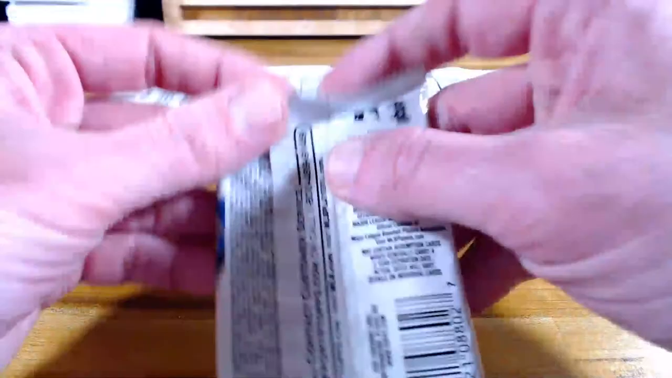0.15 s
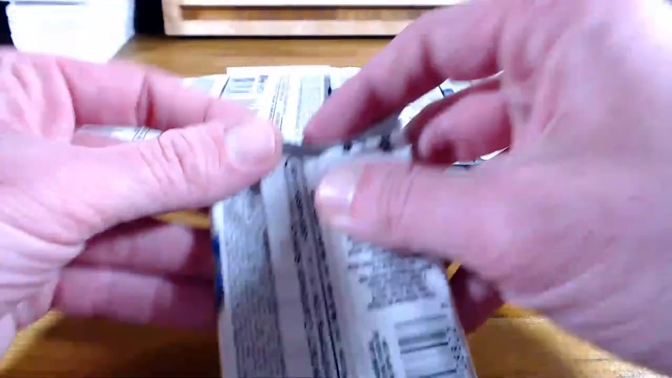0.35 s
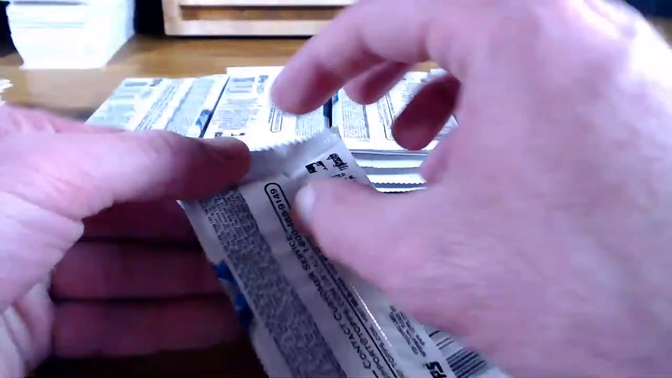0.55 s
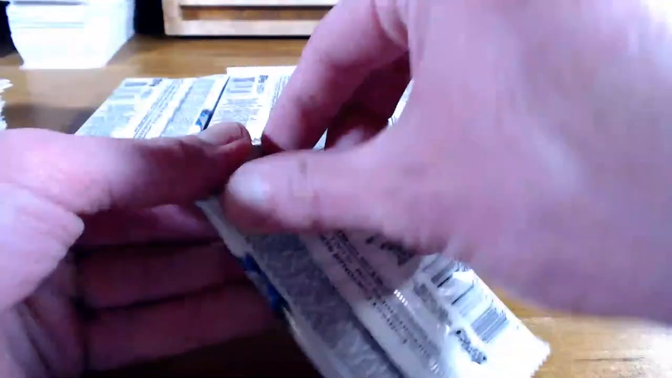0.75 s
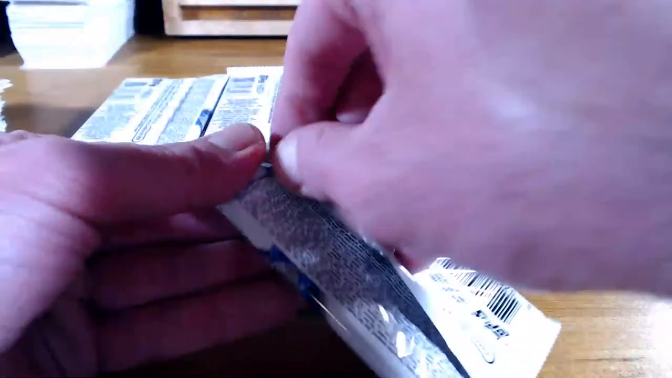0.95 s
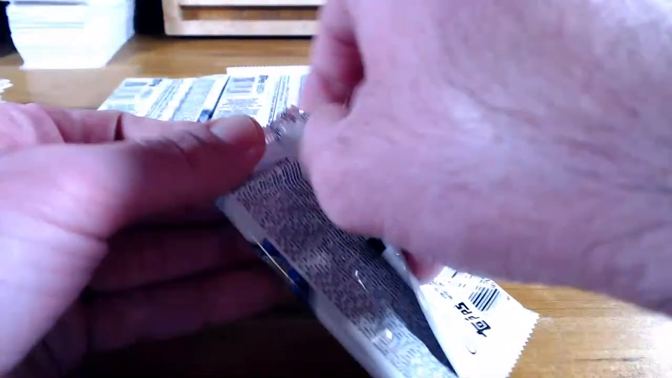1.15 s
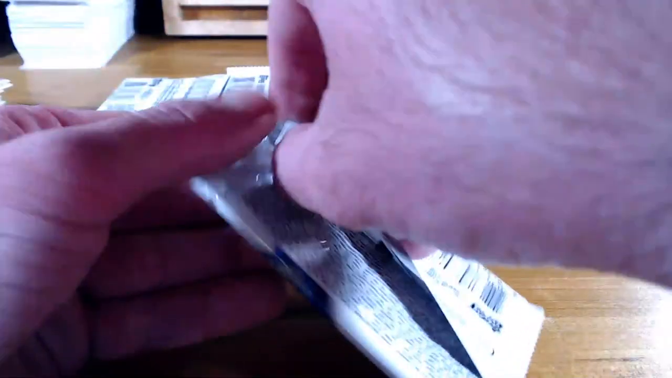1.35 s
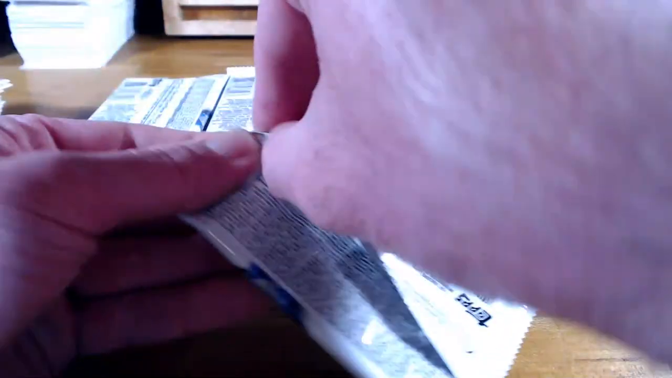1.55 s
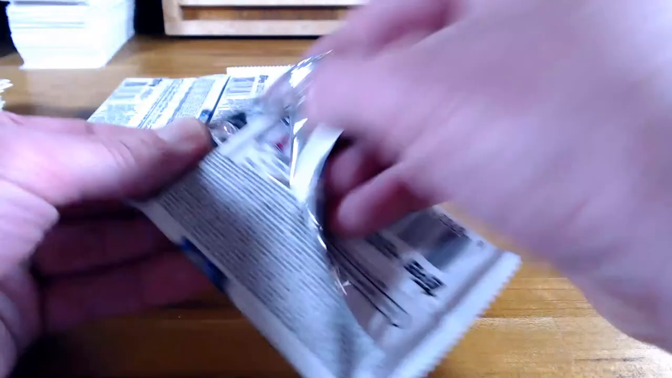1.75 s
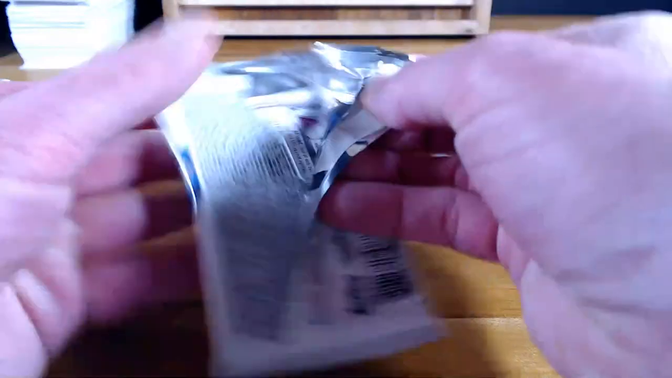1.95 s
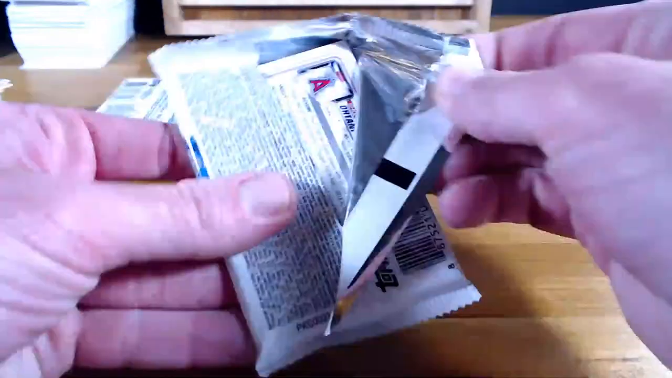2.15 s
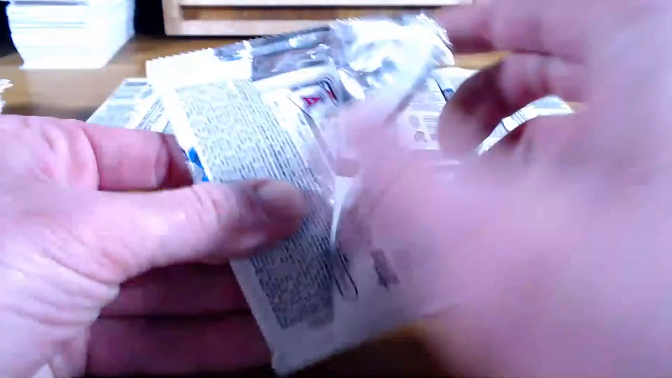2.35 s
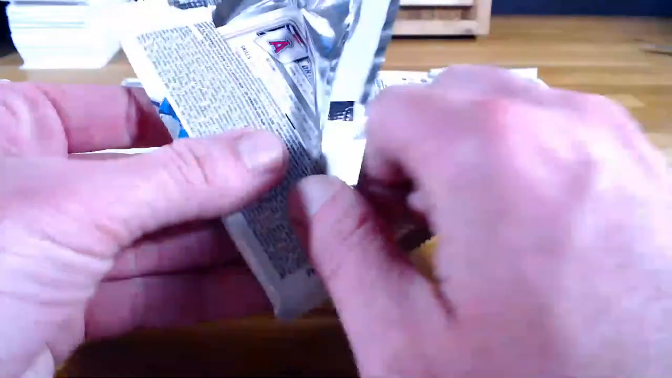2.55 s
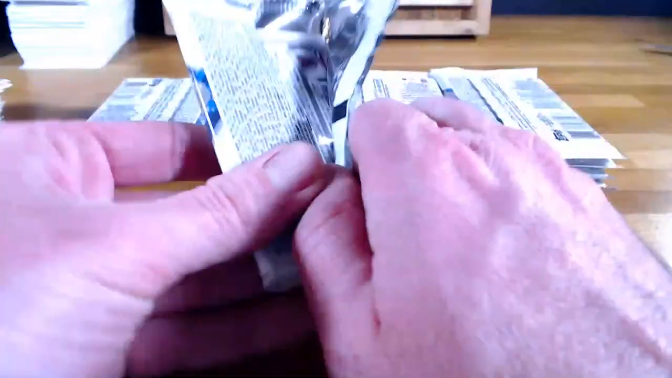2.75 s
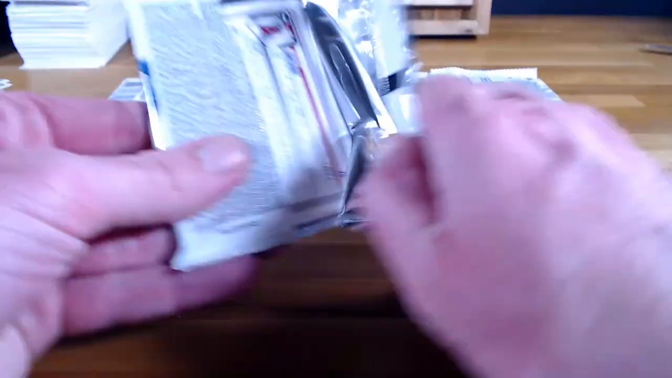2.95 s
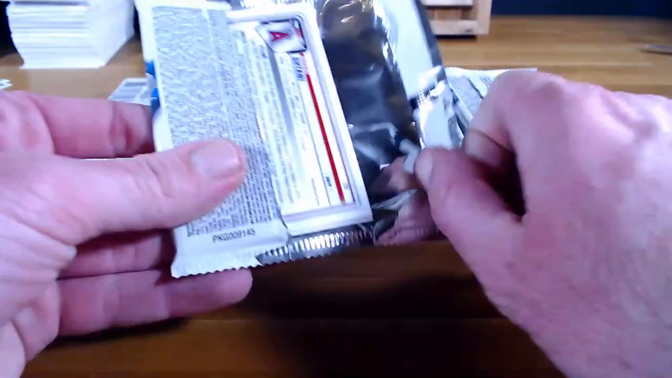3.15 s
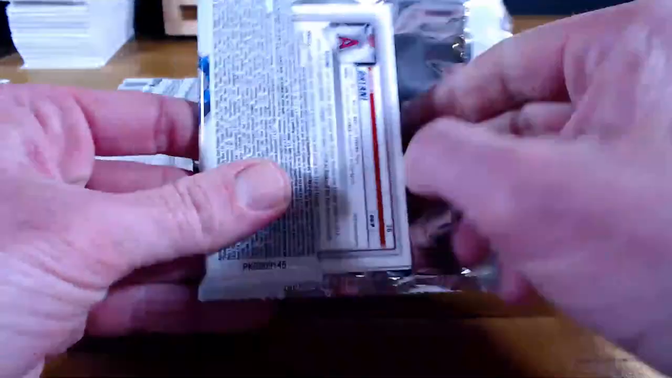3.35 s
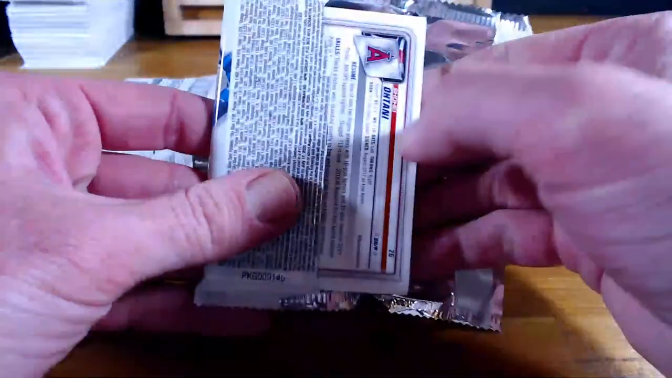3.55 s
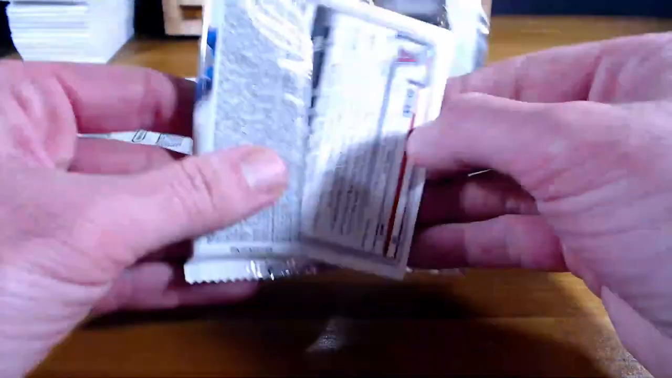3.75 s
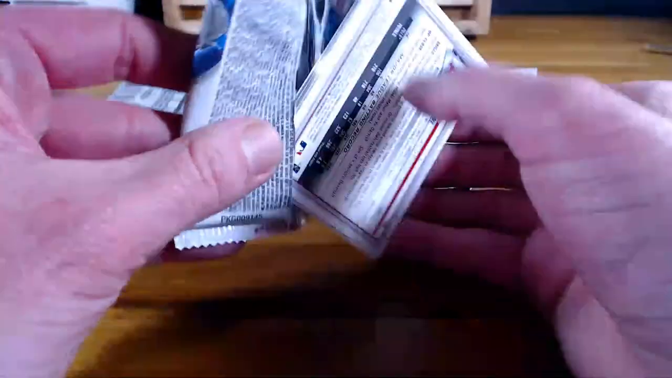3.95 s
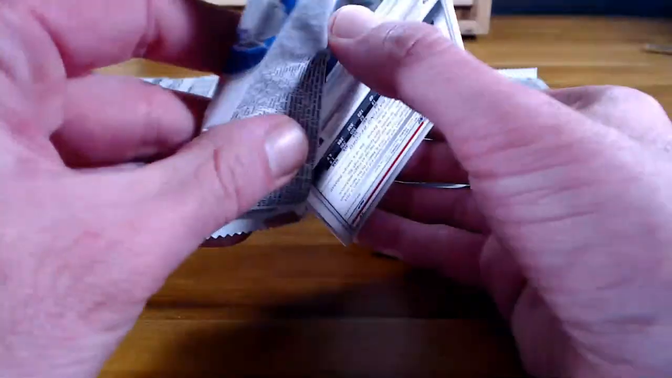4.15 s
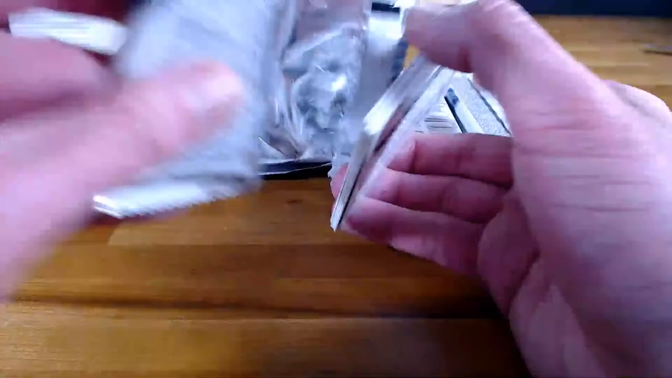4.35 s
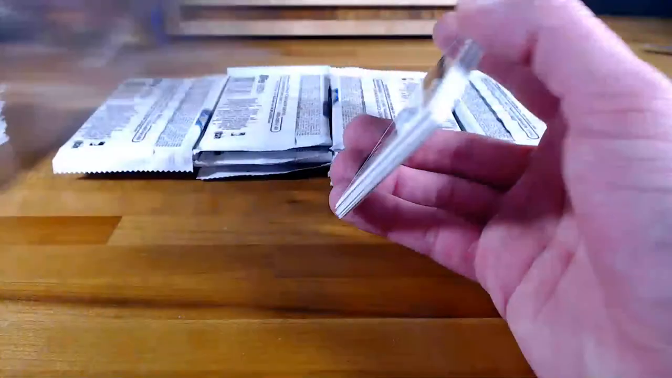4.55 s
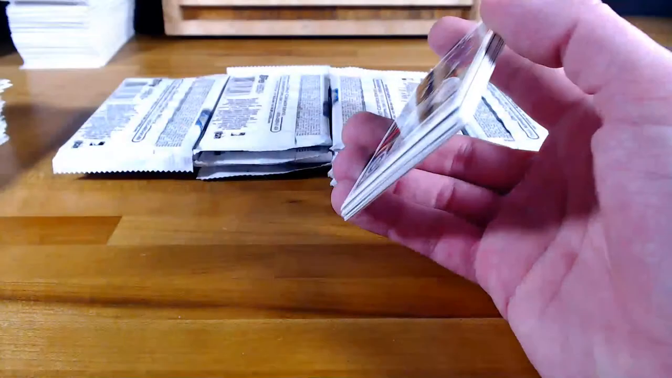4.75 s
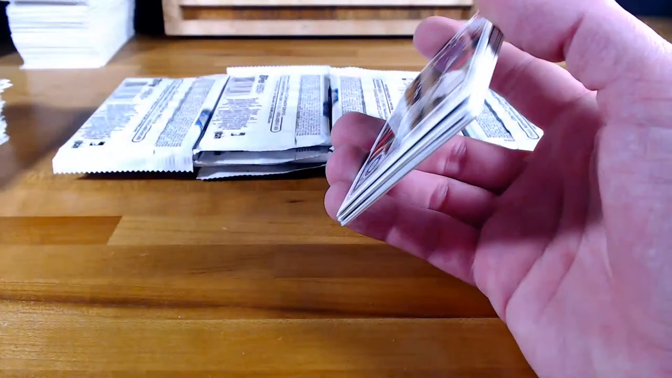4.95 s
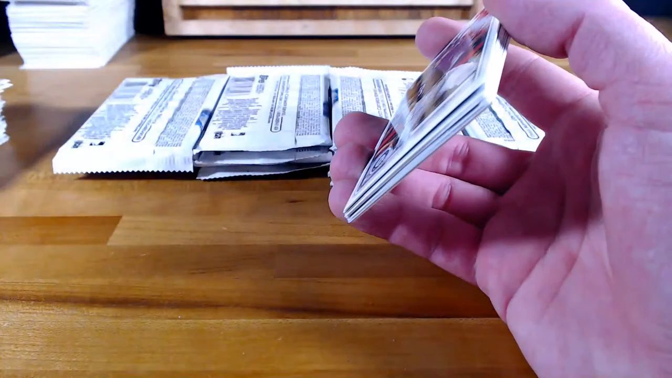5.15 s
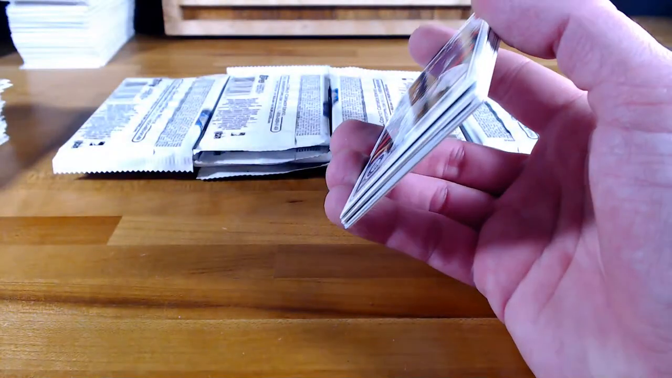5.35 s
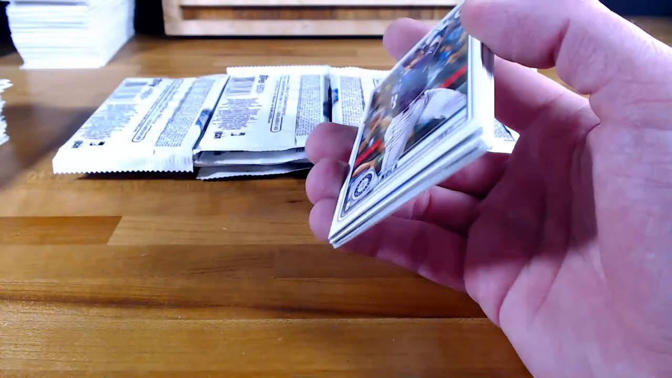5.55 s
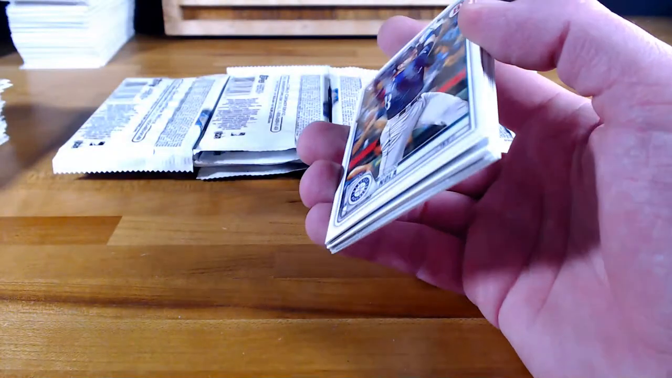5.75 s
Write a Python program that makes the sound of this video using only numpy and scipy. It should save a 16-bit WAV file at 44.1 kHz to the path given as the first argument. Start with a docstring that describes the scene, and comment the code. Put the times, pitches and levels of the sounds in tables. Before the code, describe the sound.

A small foil packet is pulled open close to a microphone over a wooden table. Bright irregular crackles and sharp snaps come in bursts, with a brief thin squeal as the seam gives. The loudest crumple comes just before three seconds, with a hollow flap; then sparse ticks, a short flurry as the cards come out, soft card taps, and low room noise in a small room.

```python
"""The foil wrapper of a card pack rubs and crackles as hands pull it open, close to a small microphone
above a wooden table: noise made of tiny slips and steady friction colours the film and its panels.
Creases snap through in short noise bursts; the glued seam rips with a thin squeal of ringing slips,
and a faint sliding squeak follows. The cards then slide against each other as they are squared up,
with dull bumps and hollow flaps around. A small room answers with random echoes, over noise and hum."""
import sys
import numpy as np
from scipy import signal
from scipy.fft import rfft, irfft, next_fast_len
from scipy.io import wavfile
from scipy.ndimage import uniform_filter1d

SR = 44100
rng = np.random.default_rng(int(sys.argv[2]) if len(sys.argv) > 2 else 0)


def log_audio(samples):
    """Write samples as a 16-bit WAV file to the path given in sys.argv[1]."""
    # one column per channel
    frames = np.atleast_2d(samples).T
    # limit to full scale, then quantise
    limited = np.clip(frames, -1, 1)
    pcm = np.round(limited * 32767).astype(np.int16)
    wavfile.write(sys.argv[1], SR, pcm)


N = 255780

# finger strokes over film and cards: [start t/s, held length t/s, sizzle level/dB, panel level/dB]
FINGER_STROKES = [(0.0, 0.018, -36.5, -46), (0.051, 0.03, -32.5, -47.5), (0.221, 0.0071, -35, -42),
                  (0.319, 0.031, -33.5, -37.5), (0.43, 0.021, -48, -43), (0.501, 0.033, -32, -36),
                  (0.585, 0.021, -58, -47), (0.689, 0.086, -35, -44), (0.83, 0.12, -24.5, -36.5),
                  (0.88, 0.022, -17, -24), (1.03, 0.082, -31, -39), (1.142, 0.11, -31.5, -43.5),
                  (1.3, 0.039, -34.5, -44), (1.377, 0.028, -20, -46), (1.398, 0.11, -34.5, -44.5),
                  (1.547, 0.12, -26.5, -32.5), (1.68, 0.14, -35.5, -41), (1.969, 0.017, -38, -44),
                  (2.007, 0.092, -32.5, -34.5), (2.15, 0.027, -33, -51), (2.353, 0.13, -30, -48.5),
                  (2.58, 0.097, -39.5, -38), (2.715, 0.18, -22, -31), (2.871, .025, -24, -20.5),
                  (2.915, 0.13, -32, -34.5), (3.095, 0.018, -23.5, -32), (3.207, 0.052, -47, -51.5),
                  (3.303, 0.014, -46.5, -50), (3.579, 0.12, -45, -56.5), (3.752, 0.055, -57, -64),
                  (3.884, 0.022, -47, -63), (4.029, 0.071, -52.5, -53), (4.155, 0.01, -31.5, -31.5),
                  (4.18, 0.041, -46, -48.5), (4.433, 0.012, -44, -61), (4.519, 0.015, -48, -47.5),
                  (4.68, 0.016, -53.5, -62), (4.741, 0.035, -55.5, -64), (4.831, 0.016, -34, -39)]
# faint rustle of the pack held in the hands: [t/s, level/dB]
GRIP_RUSTLE = [(0, -41), (1.84, -49.5), (1.87, -63), (1.94, -49), (1.98, -41), (3.15, -44.5), (3.45, -81),
               (3.62, -68), (4.0, -72.5), (4.27, -40), (4.38, -74.5), (4.78, -77.5), (4.88, -71.5),
               (5.35, -79)]
# colour of the bright film as picked up, with the microphone's dip near 7.9 kHz: [f/Hz, relative level/dB]
PICKED_UP_FILM = [(900, -34), (2000, -6.5), (2800, -5.5), (3800, 4), (5000, 1), (7200, 2), (7900, -11.5),
                  (8400, 2.5), (11000, 1), (13000, -5), (15500, -8), (16500, -13.5)]
# colour of the larger, duller panels of film: [f/Hz, relative level/dB]
PANEL_SPECTRUM = [(30, -52.5), (100, -24), (300, -21.5), (600, -11.5), (850, -10), (1200, -1.5), (1600, -1),
                  (2200, -4), (3000, -4.5), (6000, -39)]
# creases and card edges snapping at set times, loud and faint:
# [t/s, crack level/dB, panel pop level/dB, crack pitch f/Hz]
SET_SNAPS = [(.0528, -16, -59, 7100), (.1334, -22.5, -61, 10000), (.159, -29, -60, 6730),
             (.2137, -20.5, -26.5, 6300), (.3366, -38, -30, 4500), (.3501, -24.5, -45, 8160),
             (.479, -24.5, -43.5, 9450), (.5306, -20, -13, 9700), (.578, -32.5, -26, 5370),
             (.6776, -19.5, -32.5, 9430), (.8525, -15.5, -20, 10300), (.886, -12, -32, 9570),
             (.9041, -10.5, -20, 10600), (.9667, -22.5, -45, 10000), (1.0244, -27.5, -27, 8030),
             (1.037, -38, -26.5, 4300), (1.0581, -18.5, -16.5, 9300), (1.0906, -16, -32.5, 10250),
             (1.1429, -24, -52, 8900), (1.1647, -20.5, -28.5, 8140), (1.2454, -21, -36, 6300),
             (1.302, -23.5, -33, 6570), (1.3997, -10.5, -21.5, 9000), (1.4198, -20, -24, 5540),
             (1.4712, -28, -30, 10100), (1.4979, -24.5, -24, 9820), (1.6006, -16, -19.5, 10200),
             (1.607, -14.5, -23.5, 6080), (1.6368, -22.5, -18.5, 6820), (1.6543, -17, -30, 6100),
             (1.6915, -23, -19.5, 9000), (1.7008, -15.5, -27, 9800), (1.7176, -17, -28, 3800),
             (1.8029, -24, -35, 4170), (1.9486, -22, -27, 6300), (2.0121, -18, -33, 9150),
             (2.0899, -24.5, -27.5, 3800), (2.1047, -29.5, -32, 8700), (2.1322, -25.5, -41, 5700),
             (2.1688, -16.5, -59, 8000), (2.251, -27.5, -56, 5900), (2.5061, -22.5, -40, 10910),
             (2.5472, -26.5, -47.5, 7550), (2.6115, -23.5, -35, 3420), (2.7234, -16.5, -25, 4664),
             (2.736, -15, -20, 7900), (2.7756, -13, -36, 8600), (2.8121, -9, -39, 6130),
             (2.8163, -12, -35.5, 5700), (2.854, -13.5, -28, 8450), (2.8781, -12.5, -19, 8830),
             (2.8859, -9, -14.5, 8700), (3.0357, -15.5, -17.5, 5400), (3.041, -16, -34, 4300),
             (3.0712, -21, -42, 4070), (3.0977, -16.5, -22.5, 9100), (3.1265, -26, -29, 9750),
             (3.2321, -38, -30.5, 4140), (3.315, -28, -46, 9100), (3.354, -20, -27.5, 4100),
             (3.592, -41, -44, 5780), (3.6454, -32, -50, 5330), (3.6691, -26.5, -45, 6000),
             (3.749, -49, -48, 7800), (3.8843, -30, -44, 5900), (4.0676, -34, -28.5, 4750),
             (4.083, -28.5, -24, 4000), (4.06, -36, -50, 6600), (4.1445, -17, -16, 4000),
             (4.2085, -23.5, -25.5, 4300), (4.2027, -28, -25.5, 7200), (4.2345, -20, -20.5, 3900),
             (4.2999, -35, -36, 9900), (4.4109, -33.5, -54, 5600), (4.4407, -22.5, -56, 9700),
             (4.535, -33, -54, 5940), (4.823, -30.5, -32, 6800), (4.836, -24.5, -24.5, 9200)]
# squeaks of film and cards: pulls on the seam, then a faint sliding squeak at 2.45 s:
# [peak t/s, level/dB, time to rise or fall by a factor e t/s]
SQUEAKS = [(.87, -33, .03), (1.399, -20, .011), (2.45, -38, .03)]
# ringing of the squeal, shared by all the squeaks: [f/Hz, width f/Hz, relative level/dB]
SQUEAK_MODES = [(3220, 140, -6.5), (8450, 350, -13), (9540, 67, 12), (10590, 240, -13.5),
                (10900, 180, -15.5), (12100, 110, -16)]
# cards sliding in the stack: [peak t/s, level/dB, time to rise or fall by a factor e t/s]
CARD_SLIDES = [(4.77, -73, 0.019), (4.88, -36.5, 0.031), (5.0, -57, 0.073), (5.175, -62, 0.013),
               (5.265, -59, 0.024)]
# ringing of the stiff card board: [f/Hz, width f/Hz, relative level/dB]
CARD_MODES = [(1423, 210, 3), (2200, 950, 2.5), (4520, 700, -21), (10000, 6700, -13.5)]
# hands bumping the pack and the table: [t/s, level/dB, pitch f/Hz, time to fall 60 dB t/s]
HAND_BUMPS = [(0.901, -37.5, 95, 0.26), (0.898, -30, 173, 0.045), (0.961, -39, 78.5, 0.2),
              (1.4, -47, 89, .3), (1.58, -39, 97, 0.066), (2.749, -36, 263, 0.19), (2.891, -40, 87.6, 0.16),
              (4.16, -47.5, 131.6, 0.12), (4.69, -43, 211.7, 0.25), (4.945, -44, 116.9, 0.2)]
# the opened pouch flexing as a whole: [t/s, level/dB, taken 9.5 dB below the peak]
POUCH_FLEXES = [(0.902, -43.5), (2.82, -40.5), (2.887, -22.5), (2.937, -31.5), (3.039, -34.5), (3.098, -38),
                (4.084, -45), (4.15, -40.5)]
# hollow ringing of the pouch: [f/Hz, width f/Hz, relative level/dB]
POUCH_MODES = [(280, 17, -7), (344, 45, 3), (475.7, 52, 7.5), (778.5, 35, 7.5), (1436, 52, 1)]
# how long the room rings at each pitch: [f/Hz, time to fall 60 dB t/s]
ROOM_DECAY = [(150, .4), (1000, 0.21), (4000, 0.37), (9000, 0.19), (16000, 0.45)]
# colour of the room noise: [f/Hz, relative level/dB per Hz]
ROOM_NOISE = [(15, -74.5), (25, -32), (84, -11.5), (102, -9.5), (123, -6.5), (175, -9.5), (249, -5),
              (317, -11), (476, -10), (516, -17), (560, -12.5), (936, -25), (7710, -51), (10100, -38.5),
              (16000, -54)]
# steady hum tones: [f/Hz, rms level/dB]
HUM_TONES = [(118.4, -81), (247.6, -75)]

# a stroke swells and fades more slowly the longer it is: shares of its length, plus a fixed release
RISE_SHARE, RELEASE_S, LINGER_SHARE = 0.13, 0.0092, 0.16
GRIP_PANEL_DB = -14.5  # panel gain relative to the sizzle gain while the pack is only held
# decay time of a middling snap, its crack level, and the rise in level that doubles the time
SNAP_MS, SNAP_REF_DB, DB_PER_DOUBLING = 2, -25.5, 20
# small creases: average rate and middle pitch
CREASES_PER_S, CREASE_HZ = 22, 7800
# their levels above the rubbing gains, random scatter, and loudest level allowed
CREASE_CRACK_DB, CREASE_POP_DB, CREASE_SCATTER_DB, CREASE_MAX_DB = 2.5, 2.5, 6, -24
TOP_HZ = 15900  # upper edge of the sound


def effort():
    """Hand strokes swell, hold and fade over the grip's rustle; returns sizzle and panel gains."""
    t = np.arange(N) / SR
    grip = amp(np.interp(t, *np.transpose(GRIP_RUSTLE)))
    sizzle_power = grip ** 2
    panel_power = (amp(GRIP_PANEL_DB) * grip) ** 2
    for start, length, sizzle_db, panel_db in FINGER_STROKES:
        early = np.maximum(start - t, 0) / (RISE_SHARE * length)
        late = np.maximum(t - start - length, 0) / (RELEASE_S + LINGER_SHARE * length)
        stroke = np.exp(-np.minimum(early + late, 20))
        sizzle_power = sizzle_power + (amp(sizzle_db) * stroke) ** 2
        panel_power = panel_power + (amp(panel_db) * stroke) ** 2
    return np.sqrt(sizzle_power), np.sqrt(panel_power)


def rubbing(sizzle_gain, panel_gain):
    """Slips and smooth friction drive the bright film and its larger, duller panels."""
    # each slip is a short flurry that dies away within about a millisecond
    slips = crackle(rate=530, spread_db=4.0) ** 2
    energy = signal.lfilter([1], [1, -np.exp(-1 / (0.00023 * SR))], slips)

    def friction(steady):
        """Noise that follows the slips on top of steady friction."""
        return np.sqrt(energy / energy.mean() + steady) * rng.standard_normal(N)

    sizzle = coloured(shifting(friction(steady=0.87), depth_db=4.5, size=4), PICKED_UP_FILM)
    panel = coloured(shifting(friction(steady=0.26), depth_db=4.0, size=3), PANEL_SPECTRUM)
    return amp(0.16) * sizzle * sizzle_gain + amp(2.0) * panel * panel_gain


def snaps(rows):
    """A crease buckles in a short burst: a bright crack and a pop of the panel around it."""
    out = np.zeros(N)
    t = np.arange(2048) / SR
    for start, crack_db, pop_db, hz in rows:
        # bigger folds take longer to give way
        life = SNAP_MS / 1000 * 2 ** ((crack_db - SNAP_REF_DB) / DB_PER_DOUBLING)
        # the fold gathers speed, gives way, and leaves the film fluttering
        gather = np.minimum(t / 0.0004, 1)
        shape = gather * (np.exp(-t / life) + 0.05 * np.exp(-t / 0.008))
        burst = shape * rng.standard_normal(len(t))
        panel_hz = 1500 * np.exp(0.13 * rng.standard_normal())

        def crack_response(f):
            """One clear film ring over a broad one, softened at both ends."""
            film = resonance(f, hz, 0.22 * hz) + 0.36 * resonance(f, 6700, 14000)
            return film * resonance(f, 10000, 24000) * band_limit(f)

        crack = filtered(burst, crack_response)
        pop = filtered(burst, lambda f: resonance(f, panel_hz, 760) ** 2)
        add(out, start, amp(crack_db + 0.06) * snap_sized(crack) + amp(pop_db - 2.73) * snap_sized(pop))
    return out


def snap_sized(x):
    """Scale a burst so its whole energy, if packed into 4.5 ms, has rms 1."""
    return x * np.sqrt(0.0045 * SR / np.sum(x ** 2))


def small_creases(sizzle_gain, panel_gain):
    """Creases give way at random as the film is worked, their strength following the rubbing."""
    chance = rng.random(size=(400, 2))
    scatter = rng.standard_normal(size=(400, 3))
    rows = []
    for (place, luck), (crack, pop, pitch) in zip(chance, scatter):
        # keep only enough of the candidates to give the average rate
        if luck < CREASES_PER_S * N / SR / len(chance):
            at = int(place * N)
            crack_db = 20 * np.log10(sizzle_gain[at]) + CREASE_CRACK_DB + CREASE_SCATTER_DB * crack
            pop_db = 20 * np.log10(panel_gain[at]) + CREASE_POP_DB + CREASE_SCATTER_DB * pop
            hz = CREASE_HZ * np.exp(0.28 * pitch)
            rows.append((at / SR, min(crack_db, CREASE_MAX_DB), min(pop_db, CREASE_MAX_DB), hz))
    return rows


def squeaks():
    """Fast slips ring in a thin squeal, as the glued seam lets go and in a later sliding squeak."""
    slips = crackle(rate=2400, spread_db=8.0)
    return swells(SQUEAKS) * unit(ringing(slips, SQUEAK_MODES))


def cards():
    """Fine friction between cards rings the stiff board."""
    slips = crackle(rate=6100, spread_db=-1.5)
    return swells(CARD_SLIDES) * unit(ringing(slips, CARD_MODES))


def handling():
    """Hand bumps are dull fading tones; flaps of the pouch are noise bursts in its hollow ringing."""
    out = np.zeros(N)
    t = np.arange(SR // 2) / SR
    for start, db, hz, t60 in HAND_BUMPS:
        onset = 1 - np.exp(-t / 0.004)
        add(out, start, amp(db - 60 * t / t60) * np.sin(2 * np.pi * hz * t) * onset)
    for start, db in POUCH_FLEXES:
        push = rng.standard_normal(len(t)) * np.exp(-t / 0.015)
        flap = ringing(push, POUCH_MODES)
        add(out, start, amp(db + 9.5) * flap / abs(flap).max())
    return out


def room(x, wall_db, tail_db):
    """Table and room answer; random echoes are redrawn every 1/8 s so no fixed comb colours the sound."""
    out = x.copy()
    size = SR // 8
    for start in range(0, N, size):
        # the tail is noise that dies away at a different speed for each pitch
        hz, t, z = signal.stft(rng.standard_normal(SR // 3), SR, nperseg=256)
        fade = amp(-60 * t / along(ROOM_DECAY, hz)[:, None])
        buildup = 1 - np.exp(-t / 0.02)
        tail = signal.istft(z * fade * buildup, SR, nperseg=256)[1]
        # 20 early echoes at random delays
        walls = np.zeros(len(tail))
        delays = (rng.uniform(0.0015, 0.014, 20) * SR).astype(int)
        walls[delays] = rng.standard_normal(20)
        answer = amp(wall_db) * walls / np.linalg.norm(walls) + amp(tail_db) * tail / np.linalg.norm(tail)
        add(out, start / SR, signal.fftconvolve(x[start:start + size], answer))
    return out


def background():
    """Low room noise is coloured random noise; the faint hum is a set of steady sine tones."""
    t = np.arange(N) / SR
    hum = sum(amp(db) * np.sqrt(2) * np.sin(2 * np.pi * hz * t) for hz, db in HUM_TONES)
    return amp(-58.0) * coloured(rng.standard_normal(N), ROOM_NOISE) + hum


def crackle(rate, spread_db):
    """Tiny slips of mixed size at random moments, about rate per second, at rms 1."""
    sizes = amp(spread_db * np.minimum(rng.standard_normal(N), 2)) * rng.choice([-1, 1], N)
    return unit(sizes * (rng.random(N) < rate / SR))


def shifting(x, depth_db, size):
    """The film's resonances wander as it bends: smooth random gain over pitch and time."""
    z = signal.stft(x, nperseg=512)[2]
    field = uniform_filter1d(rng.standard_normal(z.shape), size=size, axis=0)  # smooth over pitch
    field = uniform_filter1d(field, size=8, axis=1)  # smooth over time
    return signal.istft(z * amp(depth_db * unit(field)), nperseg=512)[1][:N]


def swells(rows):
    """Strength over time of short pulls or slides that rise and fall exponentially."""
    t = np.arange(N) / SR
    return sum(amp(db) * np.exp(-abs(t - peak) / fade) for peak, db, fade in rows)


def resonance(f, hz, width):
    """Response of one damped vibration: a wider peak means a shorter ring."""
    return 1j * f * width / (hz * hz - f * f + 1j * f * width)


def ringing(x, modes):
    """A body rings at several pitches at once when x drives it."""
    return filtered(x, lambda f: sum(amp(db) * resonance(f, hz, width) for hz, width, db in modes))


def coloured(x, spectrum):
    """Shape x by a spectrum of (Hz, dB) points, at rms 1."""
    return unit(filtered(x, lambda f: amp(along(spectrum, f))))


def filtered(x, response):
    """Multiply the spectrum of x by a response of frequency."""
    m = next_fast_len(len(x) + 4096)
    return irfft(rfft(x, m) * response(np.fft.rfftfreq(m, 1 / SR)), m)[:len(x)]


def band_limit(f):
    """Very steep low-pass at TOP_HZ."""
    return 1 / np.sqrt(1 + (f / TOP_HZ) ** 260)


def along(points, hz):
    """Read (Hz, value) points at any pitch, on a log axis."""
    f, v = np.transpose(points)
    return np.interp(np.log(hz + 1), np.log(f + 1), v)


def amp(db):
    """Turn dB into an amplitude factor."""
    return 10 ** (np.asarray(db) / 20)


def unit(x):
    """Scale x to rms 1."""
    return x / np.sqrt(np.mean(x ** 2) + 1e-20)


def add(track, start, sound):
    """Mix a sound into a track from a start time in seconds."""
    part = track[max(round(start * SR), 0):][:len(sound)]
    part += sound[:len(part)]


def scene():
    """The pack's sounds go through the room; the background is added after."""
    gains = effort()
    film = rubbing(*gains) + snaps(SET_SNAPS) + snaps(small_creases(*gains))
    pack = film + squeaks() + cards() + handling()
    return (room(pack, wall_db=-12.0, tail_db=-16.0) + background())[None]


def record(dry):
    """The sharpest peaks are rounded off at full scale; deep bass and the top of the band are lost."""
    rounded = dry[0] / (1 + dry[0] ** 4) ** (1 / 4)

    def microphone(f):
        """Two gentle low cuts at 35 Hz and the steep upper edge."""
        return (1j * f / (35 + 1j * f)) ** 2 * band_limit(f)

    return filtered(rounded, microphone)[None]


dry = scene()
out = record(dry)
log_audio(out)
```